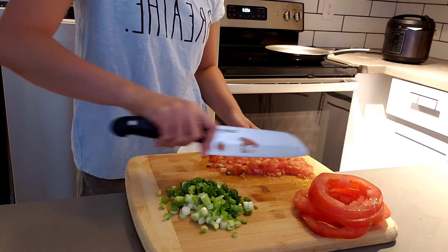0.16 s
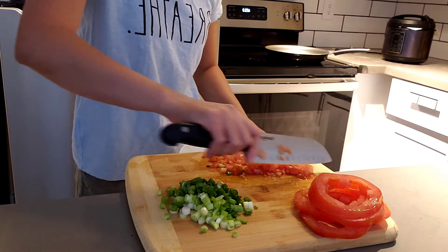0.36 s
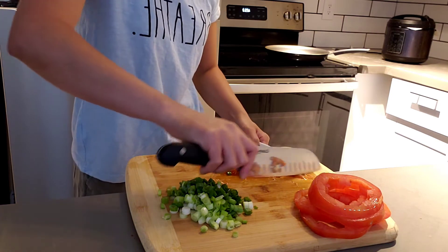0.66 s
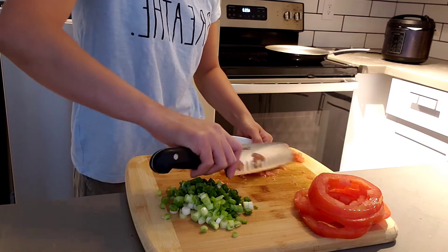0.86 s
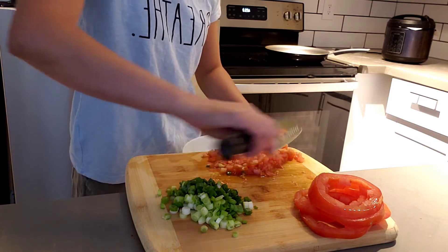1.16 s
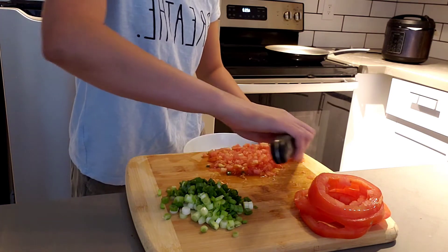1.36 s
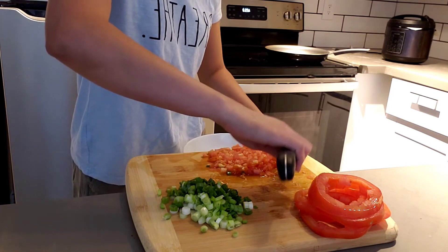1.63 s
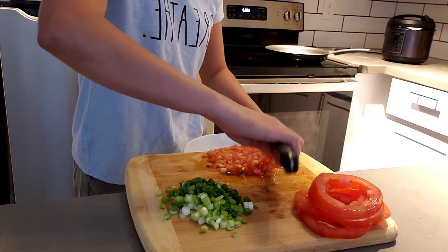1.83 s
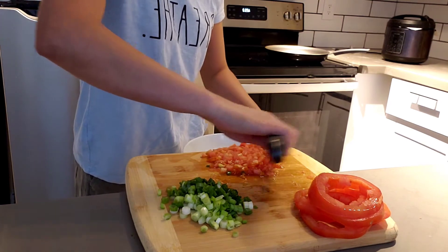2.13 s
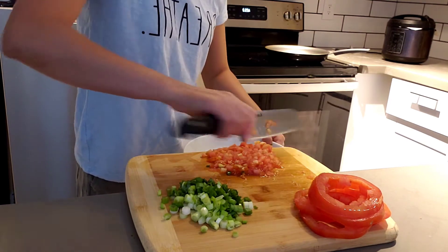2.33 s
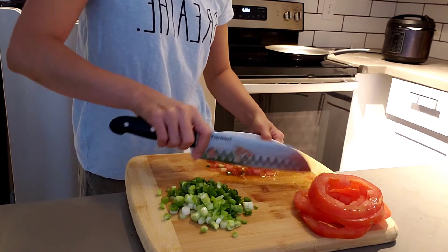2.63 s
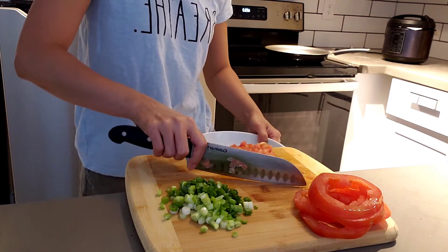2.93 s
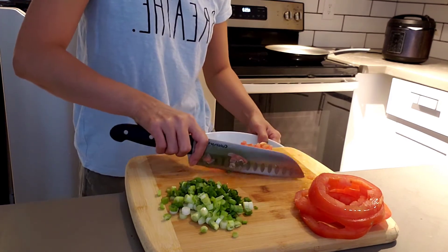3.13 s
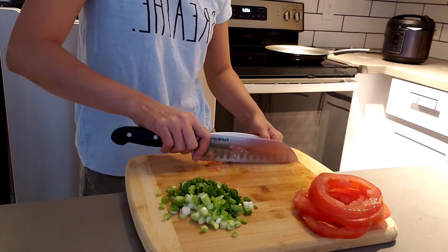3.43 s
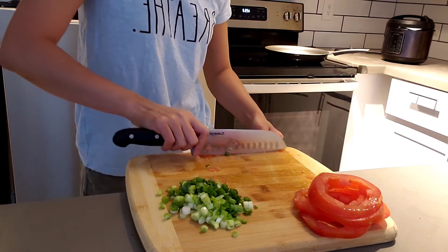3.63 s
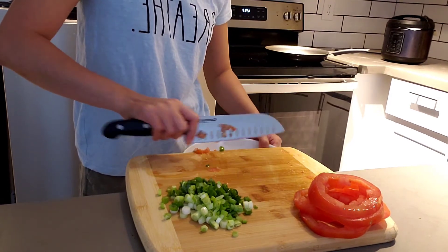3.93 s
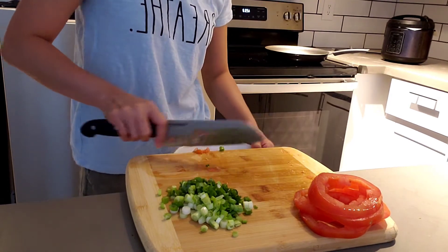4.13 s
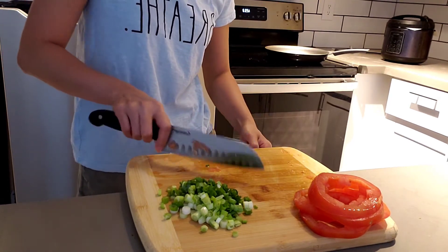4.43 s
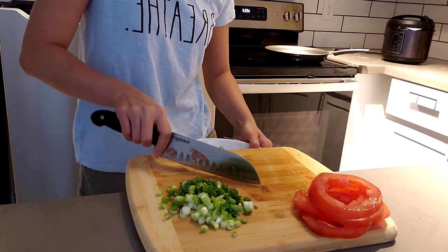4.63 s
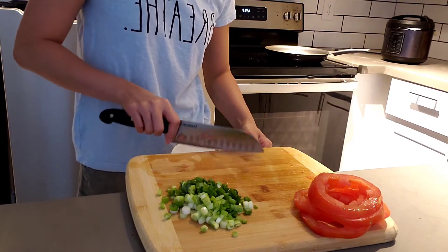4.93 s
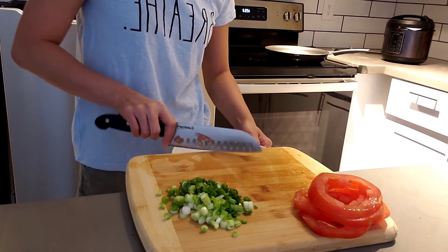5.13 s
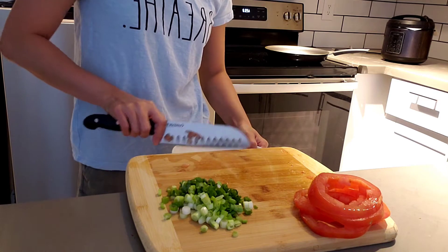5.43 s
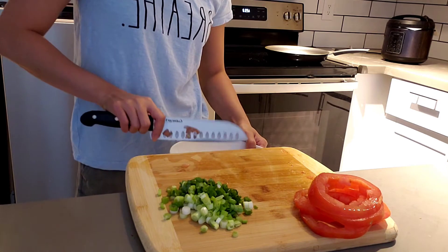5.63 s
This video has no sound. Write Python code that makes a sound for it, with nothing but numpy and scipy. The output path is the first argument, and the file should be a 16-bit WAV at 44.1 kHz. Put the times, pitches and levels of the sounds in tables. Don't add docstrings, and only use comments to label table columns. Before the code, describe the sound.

In a small tiled kitchen with a low compressor hum and a far engine fading early, a knife knocks and rings on a wooden board. A short wet scrape comes first, then soft flicks and a light plate clack, sharp cracks with a rough drag, and finally loud knocks around the strongest scrape. Close stereo microphones catch plenty of short room echo.

```python
import sys
import numpy as np
from scipy import signal
from scipy.fft import rfft, irfft, next_fast_len
from scipy.io import wavfile
from scipy.ndimage import uniform_filter1d

SR = 44100
rng = np.random.default_rng(int(sys.argv[2]) if len(sys.argv) > 2 else 0)


def gain_from_db(level_db):
    decades = np.asarray(level_db, float) / 20
    return 10 ** decades


def store_pcm(level_fs):
    pcm = np.round(np.clip(level_fs, -1, 1) * 32767).astype(np.int16)
    wavfile.write(sys.argv[1], SR, np.atleast_2d(pcm).T)


N = 254661

# f/Hz, level/dB per Hz
AIR_SPECTRUM = [(25, -12.5), (40, -23.5), (60, -3), (100, 3), (170, -7.5), (260, -15), (330, -19),
                (550, -28.5), (1100, -34.5), (4800, -44.5), (6600, -39), (8800, -48.5), (11000, -43.5),
                (14000, -41.5)]
AIR_DB = -60
# f/Hz, likeness from 0 to 1
LEFT_RIGHT_LIKENESS = [(60, 0.99), (180, 0.8), (550, 0.28), (1650, 0.046), (5000, 0.023), (15000, 0.024)]
# f/Hz, t60/s
KITCHEN_DECAY = [(120, 0.71), (300, 0.44), (700, 0.43), (1700, 0.4), (4500, 0.5), (12000, 0.36)]
MIC_LOW_HZ = 45

# multiple of the turning rate, level/dB
HUM_OVERTONES = [(1, -12), (2, -6.5), (3, -19.5), (4, -14.5)]
HUM_HZ, HUM_DB = 58.6, -59.5
BEAT_DEPTH, BEAT_S, BEAT_LOW_S = 0.63, 3.3, 2.89
ENGINE_HZ, ENGINE_HZ_PER_S, ENGINE_DB, ENGINE_GONE_S, RUMBLE_DB = 77.3, 11, -54.5, 0.71, 0.5

# f/Hz, level/dB, t60/s
PLATE_TONES = [(774, -25, 0.022), (1007, 4.5, 0.013), (1200, -11, 0.027), (1890, -24, 0.011),
               (2160, -4, 0.0082), (3200, -9, 0.027), (3380, -9, 0.023), (6180, -10, 0.013)]
PLATE_S, PLATE_DB = 2.343, -46.5
# f/Hz, level/dB, t60/s
RIM_TONES = [(459, 3.5, 0.059), (1195, -16, 0.4), (1140, -13, .1)]
# t/s, level/dB, most excited f/Hz
RIM_BLOWS = [
    (4.692, -40, 1200),
    (5.257, -34, 600),
    (5.582, -38.5, 470),
]

# f/Hz, level/dB, t60/s
STEEL_TONES = [(747, -12, 0.2), (1064, -1, .08), (1740, 0, 0.19), (1742, -12, 0.14), (2025, -10, 0.11),
               (3027, -10, 0.19), (3170, -10, 0.068), (3564, -6, 0.099), (4426, -7.5, 0.2),
               (4463, -9, 0.078), (5550, -11.5, 0.087), (6050, -6.5, .13), (6910, -9, .14),
               (7730, -6.5, 0.19), (8290, -8.5, .14), (9308, -14, .1), (9868, -13, .12),
               (10990, -10.5, 0.13), (12110, -11, .08), (12760, -19, .12), (13710, -17, .12),
               (13970, -18, .12), (14900, -20, .1)]
# t/s, level/dB, most excited f/Hz, fall-off/dB one octave away,
# share of the free ring time left by pulp and wood
RINGS = [(.683, -44, 3700, 80, 0.099), (0.937, -42.5, 2190, 0.5, 0.96), (1.222, -68.5, 2520, 23, 0.74),
         (2.345, -52.5, 3000, 4.5, 0.51), (2.924, -62, 3050, 49, 0.046), (2.927, -54, 4450, 60, 0.096),
         (3.4, -37.5, 3200, 6.5, 0.15), (4.693, -44.5, 2940, 39, 0.046), (4.694, -44.5, 4450, 68, 0.16),
         (5.3, -43, 5440, 5, 0.16), (5.621, -47.5, 4580, 38, 0.038)]

# f/Hz, width/Hz, level/dB over the plain friction
BLADE_RUBBED = [(2030, 72, 0), (4450, 200, -29), (4953, 87, -3.5), (7140, 920, -8.5), (7950, 90, -26),
                (9500, 200, -5), (11000, 190, -8.5), (11900, 570, -9.5), (15100, 610, -6.5)]
# f/Hz, width/Hz, level/dB over the plain friction
WOOD_RUBBED = [(328, 94, 1.5), (470, 28, -3.5), (1193, 19, 0), (1700, 150, -7)]
# f/Hz, level/dB per Hz
HISS_SPECTRUM = [(2650, -38), (4500, -16), (7000, -4), (8730, -5.5), (11200, 4.5), (14800, 1), (15800, -26)]
# blade f/Hz, blade width/Hz, blade level/dB over the plain friction, board f/Hz, board level/dB
SINGING = [(3670, 220, 13, 746, 15), (3140, 300, -8, 439, 3), (3750, 110, 0.5, 510, 8.5),
           (3000, 140, 1, 754, 14.5), (4150, 500, 3, 600, 14), (6960, 1500, 9, 900, 4),
           (4850, 100, 7, 1200, 14), (4700, 640, 10, 1200, 5)]
# t/s, blade speed as hiss level/dB, hand pressure as rumble level/dB
DRAGS = [
    [(.685, -64.5, -48), (.733, -62, -56), (.82, -54, -57), (.889, -49.5, -60), (.92, -60, -65)],
    [(3.08, -91, -63.5), (3.13, -56.5, -55.5), (3.27, -63, -55), (3.43, -58.5, -61.5), (3.52, -61.5, -50),
     (3.618, -51, -48), (3.68, -66.5, -57)],
    [(4.75, -73.5, -52.5), (4.826, -46, -52), (4.988, -41.5, -42.5), (5.054, -46.5, -54), (5.08, -64, -76)],
]
DRAG_GRIND_DB = [2, 2.5, -0.8]
# t/s, time to full speed/s, full speed level/dB, pressure/dB re speed, extra grind/dB
FLICKS = [
    (.938, 0.029, -52.5, 5, 7),
    (1.632, 0.027, -59, -1.5, -5),
    (2.008, 0.017, -67.5, -30, 3),
    (5.275, 0.023, -41, 2, -4),
    (5.607, 0.0092, -60, -4, -2.5),
]
FLICK_START_DB, FLICK_END_DB, FLICK_SLOWING_S = -17, -9.5, 0.048
PRESS_START_DB, PRESS_END_DB = 0.5, -5
GRIND_SHARE = 0.67

# t/s, crack level/dB, crack f/Hz, board thud level/dB re crack, thud centre f/Hz
BLOWS = [(.684, -41, 893, -31, 560), (0.908, -44, 746, 2.5, 236), (.938, -34, 1400, -16.5, 234),
         (1.224, -53, 710, 13, 225), (1.63, -38, 794, -0.5, 402), (2.062, -60.5, 950, -9, 236),
         (2.925, -28.5, 1870, -57, 402), (2.954, -32.5, 1350, -37, 560), (3.273, -46, 820, -3, 315),
         (3.402, -31, 1380, -14, 474), (3.442, -54, 650, 8, 228), (4.692, -23, 1620, -17, 360),
         (5.257, -22.5, 1160, -6.5, 407), (5.299, -30.5, 755, -7.5, 283), (5.582, -34, 1330, 0, 430),
         (5.623, -52, 1200, 2, 427)]
# f/Hz, level/dB, t60/s
BOARD_TONES = [(129.2, -0.5, 0.15), (176.2, 1, 0.079), (240.8, -1, 0.081), (269.9, -1.5, 0.1),
               (332, 2.5, 0.047), (381.5, 2, 0.048), (463, 5.5, 0.034), (560, -0.5, 0.034),
               (689, 1.5, 0.044), (856, -3, 0.042)]
# t/s, level/dB
TICKS = [
    (0.683, -58),
    (.908, -41.5),
    (.938, -42),
    (1.631, -51.5),
    (3.401, -62),
    (5.257, -50.5),
    (5.3, -48),
    (5.624, -55),
]


def evened(x):
    return x / np.sqrt(np.mean(x ** 2) + 1e-20)


def read(points, hz):
    f, value = np.transpose(points)
    return np.interp(np.log(hz + 1), np.log(f + 1), value)


def curve(rows, t):
    s, *columns = np.transpose(rows)
    return [np.interp(t, s, c) for c in columns]


def colour(x, gain):
    size = x.shape[-1]
    return irfft(rfft(x) * gain(np.fft.rfftfreq(size, 1 / SR)), size)


def band(lo_hz, hi_hz, order=3):
    def gain(f):
        low_side = 1 + (lo_hz / (f + 1)) ** (2 * order)
        high_side = 1 + (f / hi_hz) ** (2 * order)
        return 1 / np.sqrt(low_side * high_side)
    return gain


def peaks(table):
    return lambda f: np.sqrt(1 + sum(gain_from_db(db + 9) ** 2 / (1 + (2 * (f - hz) / width) ** 2)
                                     for hz, width, db in table))


def sing(hz, width, db):
    return lambda f: abs(1 + 1j * gain_from_db(db) / (1 + 2j * (f - hz) / width))


def ring(tones, lean_db, damping=1):
    t = np.arange(20000) / SR
    out = np.zeros(len(t))
    for hz, db, t60 in tones:
        out += gain_from_db(db + lean_db(hz) - 60 * t / (t60 * damping)) * np.sin(2 * np.pi * hz * t)
    return out


def wander(rate_hz):
    return evened(colour(rng.standard_normal(N), band(0.13, rate_hz, order=2)))


def add(mix, s, sound):
    part = mix[round(s * SR):][:len(sound)]
    part += sound[:len(part)]


def leaving(t):
    return np.exp(-(t / ENGINE_GONE_S) ** 2)


def air():
    frames, hz = N // 512 + 6, np.fft.rfftfreq(2048, 1 / SR)
    a, b, c, d = rng.standard_normal((frames, len(hz), 4)).T
    same = np.clip(read(LEFT_RIGHT_LIKENESS, hz), -1, 1)[:, None]
    left = a + 1j * b
    right = same * left + np.sqrt(1 - same ** 2) * (c + 1j * d)
    z = np.array([left, right]) * gain_from_db(read(AIR_SPECTRUM, hz)[:, None])
    steady = signal.istft(z, nperseg=2048, noverlap=1536)[1]
    level = np.sqrt(np.mean(steady ** 2))
    swell_db = RUMBLE_DB * leaving(np.arange(frames) * 512 / SR)
    low = 1 / (1 + (hz / 500) ** 4)
    z *= gain_from_db(low[:, None] * swell_db)
    return gain_from_db(AIR_DB) * signal.istft(z, nperseg=2048, noverlap=1536)[1][:, :N] / level


def machines():
    t = np.arange(N) / SR
    turns = np.cumsum(HUM_HZ * (1 + 0.0027 * wander(3.3))) / SR
    overtones = np.zeros(N)
    for k, db in HUM_OVERTONES[1:]:
        overtones += gain_from_db(db + 0.68 * k * wander(12)) * np.sin(2 * np.pi * (k * turns + rng.random()))
    beat = 1 - BEAT_DEPTH * np.cos(2 * np.pi * (t - BEAT_LOW_S) / BEAT_S)
    lowest = gain_from_db(HUM_DB + 1.1 * wander(4)) * beat * np.sin(2 * np.pi * turns)
    hum = gain_from_db(-57.5) * overtones + lowest
    engine_turns = (ENGINE_HZ + ENGINE_HZ_PER_S * t / 2) * t
    drone = gain_from_db(ENGINE_DB + 4.3 * wander(17)) * leaving(t) * np.sin(2 * np.pi * engine_turns)
    return np.sqrt(2) * (hum + drone) * gain_from_db(np.array([[.6], [-.6]]))


def kitchen(x, direct_db, wet_db):
    size = 30000
    t = np.arange(size) / SR
    taps = rng.standard_normal((2, size)) * np.clip((t - .001) / 0.0026, 0, 1)
    taps *= 1 + 0.92 * np.exp(-t / 0.0078)
    hz, frame_t, z = signal.stft(taps, SR, nperseg=256)
    same = 1 / (1 + (hz / 520) ** 2)[:, None]
    z[1] = same * z[0] + np.sqrt(1 - same ** 2) * z[1]
    fade = gain_from_db(-60 * frame_t / read(KITCHEN_DECAY, hz)[:, None])
    tail = signal.istft(z * fade, SR, nperseg=256)[1]
    tail *= gain_from_db(wet_db) / np.linalg.norm(tail[0])
    tail[[0, 1], [0, 1]] += gain_from_db(direct_db)
    heard = colour(x, band(MIC_LOW_HZ, 30000))
    balance = gain_from_db(np.array([[1.3], [-1.3]]))
    return signal.fftconvolve(heard[None], tail, axes=1)[:, :N] * balance


def plate():
    out = np.zeros(N)
    soft_start = np.minimum(np.arange(20000) / SR / 0.0032, 1)
    add(out, PLATE_S, gain_from_db(PLATE_DB) * ring(PLATE_TONES, lambda f: 0))
    for s, db, centre_hz in RIM_BLOWS:
        sound = ring(RIM_TONES, lambda f: -6.1 * np.log2(f / centre_hz) ** 2)
        add(out, s, gain_from_db(db) * soft_start * sound)
    return out


def rings():
    out = np.zeros(N)
    for s, db, centre_hz, fall_db, share in RINGS:
        sound = ring(STEEL_TONES, lambda f: -fall_db * np.log2(f / centre_hz) ** 2, np.clip(share, .03, 1.2))
        add(out, s, gain_from_db(db) * sound)
    return out


def flick(s, rise, db, press_db, grind_db):
    press = db + press_db
    rows = [(s, db + FLICK_START_DB, press + PRESS_START_DB),
            (s + rise, db, press),
            (s + rise + FLICK_SLOWING_S, db + FLICK_END_DB, press + PRESS_END_DB)]
    return rows, grind_db


def edge_slips():
    size = next_fast_len(round(.7 * SR))
    strength = gain_from_db(4.5 * np.minimum(rng.exponential(1, size), 4))
    happens = rng.random(size) < 9000 / SR
    slips = strength * happens * rng.choice([-1., 1.], size)
    slips = evened(slips) + 0.8 * rng.standard_normal(size)
    judder = evened(colour(rng.standard_normal(size), band(2, 110)))
    slips *= gain_from_db(1.6 * judder)
    _, _, z = signal.stft(slips, SR, nperseg=512)
    patches = uniform_filter1d(rng.standard_normal(z.shape), size=4, axis=0)
    patches = uniform_filter1d(patches, size=7, axis=1)
    return signal.istft(z * gain_from_db(3.7 * evened(patches)), SR, nperseg=512)[1][:size]


def stroke(rows, flat_db, singing):
    t = np.arange(rows[0][0], rows[-1][0] + 0.037, 1 / SR)
    hiss_db, rumble_db = curve(rows, t)
    grind_db = flat_db + GRIND_SHARE * hiss_db + (1 - GRIND_SHARE) * rumble_db
    blade_hz, blade_width, blade_db, board_hz, board_db = singing
    slips = edge_slips()
    blade = colour(colour(slips, peaks(BLADE_RUBBED)), sing(blade_hz, blade_width, blade_db))
    board = colour(colour(slips, peaks(WOOD_RUBBED)), sing(board_hz, 70, board_db))
    hiss = evened(colour(blade, lambda f: gain_from_db(read(HISS_SPECTRUM, f))))[:len(t)]
    grind = evened(colour(blade, band(2540, 4600)))[:len(t)]
    rumble = evened(colour(board, band(140, 1870)))[:len(t)]
    touching = np.clip(np.minimum((t - t[0]) / 0.0015, (t[-1] - t) / 0.08), 0, 1)
    return touching * (gain_from_db(hiss_db) * hiss + gain_from_db(grind_db) * grind + gain_from_db(rumble_db) * rumble)


def scrape():
    out = np.zeros(N)
    strokes = list(zip(DRAGS, DRAG_GRIND_DB)) + [flick(*row) for row in FLICKS]
    for (rows, grind_db), singing in zip(strokes, SINGING):
        add(out, rows[0][0], stroke(rows, grind_db, singing))
    return out


def blows():
    out, t = np.zeros(N), np.arange(20000) / SR
    soft_start = np.sin(np.pi / 2 * np.minimum(t / 0.0015, 1)) ** 2
    for s, db, crack_hz, thud_db, thud_hz in BLOWS:
        u = 3.09 * ((t - .0006) * crack_hz - .7)
        crack = u * np.exp(-u ** 2)
        thud = ring(BOARD_TONES, lambda f: -5.5 * np.log2(f / thud_hz) ** 2) * soft_start
        add(out, s, gain_from_db(db) * (gain_from_db(9.0) * crack + gain_from_db(thud_db - 1.5) * thud))
    for s, db in TICKS:
        noise = colour(rng.standard_normal(len(t)), band(4000, 19500))
        add(out, s, gain_from_db(db) * np.exp(-t / 0.0018) * noise)
    return out


def scene():
    background = air() + machines()
    ringing = kitchen(rings(), -1.4, 7.04)
    scraping = kitchen(scrape(), -5.5, -2.8)
    striking = kitchen(blows() + plate(), -0.097, 6.55)
    return background + ringing + scraping + striking


def top_cut(x):
    return signal.sosfilt(signal.butter(12, 16170, fs=SR, output="sos"), x)


def record(dry):
    low_pass = signal.firwin(511, 15650, window=("kaiser", 9), fs=SR)
    limited = signal.oaconvolve(dry, low_pass[None], "same")
    return top_cut(limited)


dry = scene()
out = record(dry)
store_pcm(out)
```